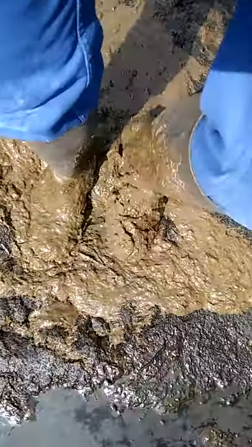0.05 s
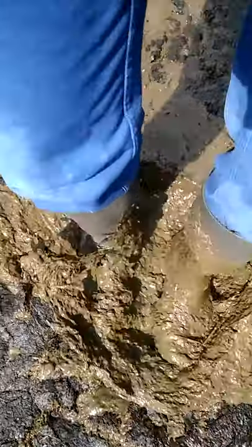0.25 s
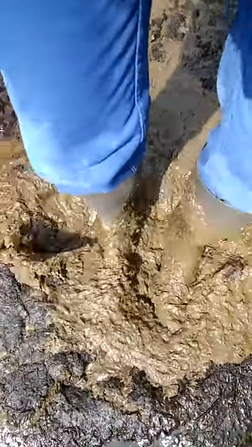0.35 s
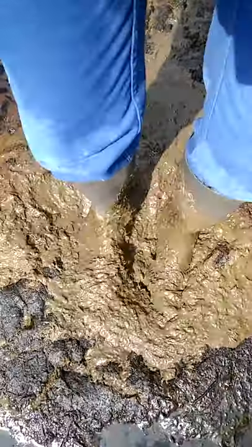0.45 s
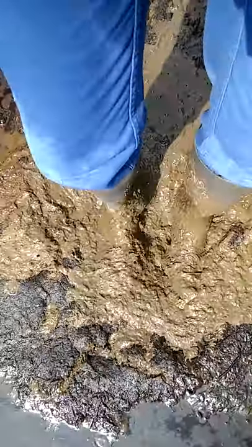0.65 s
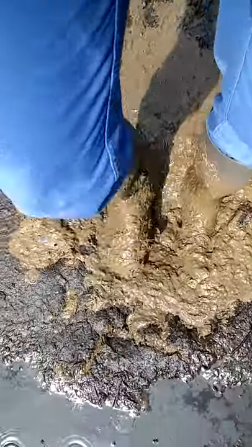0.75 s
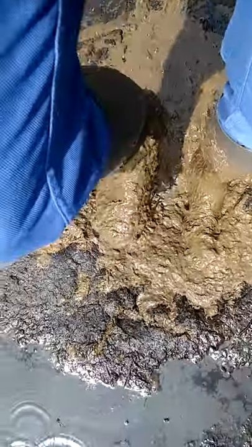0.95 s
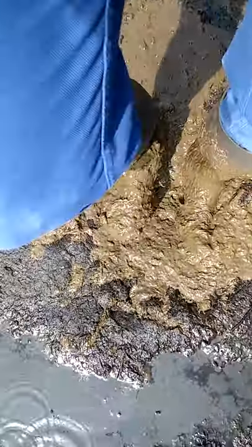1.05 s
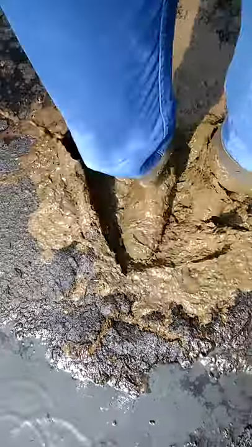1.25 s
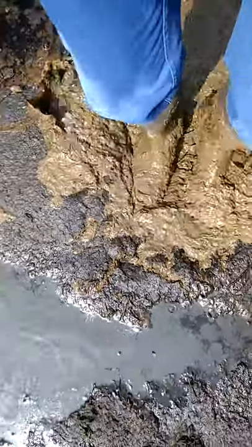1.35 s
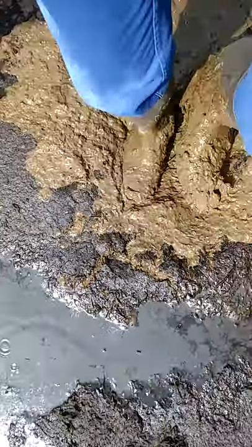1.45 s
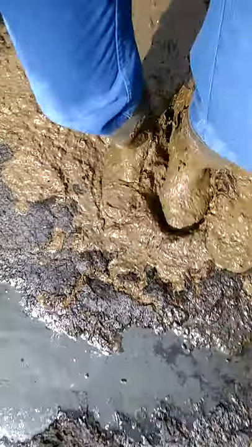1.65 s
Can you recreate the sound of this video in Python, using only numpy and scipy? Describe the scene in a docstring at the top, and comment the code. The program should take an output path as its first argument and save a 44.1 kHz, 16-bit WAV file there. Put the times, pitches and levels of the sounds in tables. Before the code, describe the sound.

Two wet, squelching boot stomps in mud, with wind on the microphone and faint birdsong.

```python
"""Boots stomping in wet mud

Rubber boots stomp twice in thick mud, close by, with smaller squelches as the weight shifts.
Each stomp squirts mud out in quick spurts, with wet pops and clicks, and the surface crackles.
Moving air buffets the microphone, most of all after the first stomp.
A songbird whistles farther off, with an outdoor echo."""
import sys
import numpy as np
from scipy import signal
from scipy.fft import rfft, irfft
from scipy.io import wavfile
from scipy.ndimage import uniform_filter1d

SR = 44100
rng = np.random.default_rng(int(sys.argv[2]) if len(sys.argv) > 2 else 0)


def bounce(signal):
    """Save signal as a 16-bit WAV file at the path given by the first command-line argument."""
    frames = np.transpose(np.atleast_2d(signal))
    limited = np.clip(frames, -1, 1)
    pcm = np.round(limited * 32767).astype(np.int16)
    wavfile.write(sys.argv[1], SR, pcm)


N = 74970
T = np.arange(N) / SR

# Squirts of mud: start_s, rise_s, fade_s, body_db, squelch_db, spray_db
# (fade_s is always the time a sound takes to drop by 60 dB)
SPURTS = [(0.203, 0.0056, 0.049, -19.5, -13.5, -12), (0.2203, 0.0015, 0.041, -17, -25, -18),
          (0.227, 0.0031, 0.11, -20.5, -15.5, -24), (0.244, 0.0043, 0.019, -21.5, -17, -37),
          (0.266, 0.002, 0.079, -54, -31, -31.5), (0.422, 0.021, 0.066, -54, -37, -43),
          (0.4635, 0.00053, 0.026, -42, -25, -28.5), (0.508, 0.00095, 0.021, -36.5, -37.5, -63),
          (0.636, 0.0016, 0.048, -53, -35, -45), (0.821, 0.035, 0.06, -41.5, -43.5, -75),
          (0.854, 0.003, 0.052, -31.5, -45, -54), (0.862, 0.0024, 0.02, -36.5, -33, -49),
          (0.911, 0.0011, 0.0064, -41, -43, -42), (0.9283, 0.00096, 0.013, -63, -33.5, -37.5),
          (1.164, 0.02, 0.1, -45.5, -43, -60), (1.2241, 0.0018, 0.024, -17.5, -13.5, -13.5),
          (1.2304, 0.002, 0.042, -14, -6.5, -19.5), (1.244, 0.0078, 0.097, -24, -17.5, -30.5),
          (1.2558, 0.00041, 0.024, -19, -12, -17), (1.268, 0.002, 0.0087, -25.5, -19.5, -27.5),
          (1.3992, 0.00036, 0.015, -36, -47, -51), (1.4999, 0.00053, 0.057, -37.5, -29.5, -46),
          (1.507, 0.00085, 0.24, -38.5, -38.5, -58), (1.535, 0.00086, 0.029, -52, -36, -46.5),
          (1.5603, 0.00043, 0.024, -34, -41, -47.5), (1.666, 0.004, 0.013, -44, -28.5, -33)]
# A squirt's low, middle and high tone, as coloured by the microphone: pitch_hz, relative_db
BODY_TONE = [(40, -18.5), (120, -2), (260, 1), (420, -2.5), (700, -4), (1150, 1), (1600, -3.5),
             (2300, -2.5), (6000, -48)]
SQUELCH_TONE = [(700, -39.5), (1500, -35.5), (2050, -0.5), (2800, -2.5), (3400, -6.5), (4200, 0),
                (4900, -11), (5800, -15.5), (12000, -64)]
SPRAY_TONE = [(2500, -29.5), (5200, -4.5), (6500, -9.5), (7500, -1.5), (9000, -4), (10300, -10),
              (11700, -9.5), (13500, -21), (16000, -13.5)]

def mud_spurts():
    """Mud squirts from under a boot in dense snaps: a dull body, a wet squelch and a fine spray."""
    shapes = np.array([swell(*row[:3]) for row in SPURTS])
    levels = from_db(np.array(SPURTS)[:, 3:])
    out = 0
    for level, tone in zip(levels.T, (BODY_TONE, SQUELCH_TONE, SPRAY_TONE)):
        loudness = np.sqrt(level ** 2 @ shapes ** 2)   # overlapping spurts add their power
        out += with_tone(loudness * snaps(per_s=5000, spread_db=1, hiss=0.28), tone)
    return out


# Wet pops and clicks: start_s, pitch_hz, level_db, fade_s, glide_octaves
POPS = [(.2105, 2048, -10, 0.021, -.1), (0.2149, 9170, -3.5, 0.0027, 0), (0.2196, 2002, 0, 0.015, 0.071),
        (0.2218, 2840, -5.5, 0.02, 0.18), (0.223, 4490, -10, 0.017, -0.2),
        (.248, 4180, -12.5, 0.022, -0.087), (0.264, 1670, -19.5, 0.022, 0.16),
        (.279, 1870, -23, 0.011, -.1), (0.4628, 2733, -20, 0.023, 0.79), (0.4668, 4544, -21.5, 0.032, -0.3),
        (.853, 1068, -24, 0.039, 0.16), (0.854, 2660, -29, 0.012, 0.098), (0.985, 2930, -34.5, 0.022, .1),
        (1.2255, 703, -19.5, 0.068, 0), (1.2262, 3223, -5.5, 0.032, 0.66), (1.2365, 4420, -7, 0.016, -0.14),
        (1.271, 3990, -18, 0.028, -0.033), (1.401, 825, -37.5, 0.013, 0), (1.48, 4600, -31, 0.018, -.2),
        (1.5007, 1244, -21.5, 0.024, .9), (1.502, 4450, -20, 0.03, -.13),
        (1.537, 550, -19.5, 0.022, -0.042), (1.5362, 1134, -17.5, 0.017, -0.0055),
        (1.538, 1720, -28.5, 0.026, -0.069), (1.54, 4400, -22, 0.029, -0.21),
        (1.583, 4400, -36.5, 0.026, 0)]

def wet_pops():
    """Short, rough pops and clicks; those near 4.2 kHz are the microphone ringing on sharp snaps."""
    out = 0
    for start_s, hz, db, fade_s, glide_octaves in POPS:
        roughness = 1 + 0.54 * waver(samples=int(3 * SR / hz))
        rise_s = 0.0003 + 1 / hz   # low pops start more slowly
        out += roughness * ring(start_s, hz, db, fade_s, rise_s, glide_octaves)
    return out


# Dull thumps: start_s, pitch_hz, level_db, fade_s
THUMPS = [(0.21, 72.4, -22, 0.043), (0.289, 256, -14.5, 0.0051), (0.315, 180, -13.5, 0.031),
          (0.378, 138, -17.5, 0.15), (0.3794, 627, -18.5, 0.003), (0.4374, 410, -22, 0.0046),
          (0.848, 303, -35, 0.046), (1.172, 232, -40.5, 0.062), (.438, 143, -13, 0.029),
          (0.451, 62.8, -16, 0.17), (.575, 106.6, -19.5, 0.091), (1.227, 133, -14.5, 0.097),
          (1.226, 247.7, -12, 0.051), (1.245, 65.6, -29, 0.29)]

def low_thumps():
    """Dull thumps come from the stomps and from puffs of air hitting the microphone."""
    return sum(ring(*row, rise_s=0.0031) for row in THUMPS)


# How loudly the mud crackles: time_s, level_db
CRACKLE_LEVELS = [(0, -54), (.2, -59.5), (.225, -38), (.29, -48), (.42, -47), (.565, -48.5), (.585, -40.5),
                  (.658, -50.5), (.675, -62), (.9, -53.5), (1.1, -63.5), (1.22, -55), (1.29, -44.5),
                  (1.35, -51), (1.46, -48.5), (1.6, -55), (1.7, -48.5)]
# The crackle's tone, as coloured by the microphone: pitch_hz, relative_db
CRACKLE_TONE = [(200, -0.5), (900, 3), (1450, -7.5), (2100, 6.5), (3200, -0.5), (4200, 6), (5200, -1),
                (6500, -6), (8300, -5), (10500, -11.5), (16000, -12)]

def mud_crackle():
    """The disturbed mud fizzes with tiny snaps and bubbles."""
    fizz = snaps(per_s=510, spread_db=2.5, hiss=0.89) + from_db(-2.5) * bubbles()
    return with_tone(from_db(curve(CRACKLE_LEVELS)) * unit_level(fizz), CRACKLE_TONE)


def bubbles(pitch_count=20, fade_cycles=48):
    """Tiny bubbles burst at random, each ringing briefly at its own pitch."""
    bursts = snaps(per_s=1100, spread_db=3.5, hiss=0)
    pitch_choice = rng.integers(0, pitch_count, N)
    out = 0
    for k, hz in enumerate(np.geomspace(1100, 12000, pitch_count)):
        angle = 2 * np.pi * hz / SR
        decay = from_db(-60 * hz / (fade_cycles * SR))
        kicks = bursts * (pitch_choice == k) + 1e-18
        feedback = [1, -2 * decay * np.cos(angle), decay * decay]   # makes each kick ring
        out += signal.lfilter([np.sin(angle), -np.sin(angle)], feedback, kicks)
    return unit_level(out)


# Lone drops of mud: start_s, level_db
DROPS = [(0.036, -43), (0.375, -38.5), (.658, -54), (.756, -46.5)]

def mud_drops():
    """Each drop lands with one short, wet tick."""
    loudness = sum(from_db(db) * swell(start_s, rise_s=0.0003, fade_s=0.017) for start_s, db in DROPS)
    return with_tone(loudness * rng.standard_normal(N), SPRAY_TONE)


# How hard the air hits the microphone: time_s, level_db
GUST_LEVELS = [(0, -54.5), (.19, -55), (.22, -25), (.27, -29.5), (.345, -25.5), (.38, -20.5), (.42, -25),
               (.445, -20), (.49, -40.5), (.568, -45.5), (.58, -32.5), (.62, -29), (.635, -38.5),
               (.68, -42), (.72, -53), (1.05, -60), (1.21, -53.5), (1.26, -34), (1.37, -43.5),
               (1.41, -40.5), (1.46, -49.5), (1.62, -50.5), (1.68, -33), (1.7, -45)]
# The tone of its deep rumble and its higher flutter: pitch_hz, relative_db
RUMBLE_TONE = [(20, -42), (35, -17), (50, 2.5), (85, -2), (125, -9.5), (200, -22.5), (400, -26.5),
               (1000, -57.5), (3000, -107)]
FLUTTER_TONE = [(50, -39.5), (115, 4.5), (220, 6), (400, -9.5), (750, -22), (1100, -43.5), (3000, -63)]

def air_buffeting():
    """Moving air rumbles on the microphone, and flutters too when it is strong."""
    gust_db = curve(GUST_LEVELS)
    flutter_db = -27.5 + 2.06 * (gust_db + 21)   # grows about twice as fast as the rumble
    rumble = from_db(gust_db) * steady_noise(RUMBLE_TONE, samples=1500)
    flutter = from_db(flutter_db) * steady_noise(FLUTTER_TONE, samples=1200)
    return rumble + flutter


# Bird notes, each a list of points: time_s, pitch_hz, level_db
BIRD_NOTES = [
    [(.005, 3600, -46), (.032, 4110, -46)],
    [(.028, 2840, -52), (.046, 3190, -39), (.065, 3220, -39.5), (.077, 3310, -40), (.092, 3720, -39.5),
     (.112, 4080, -42.5), (.13, 3710, -41)],
    [(.476, 2514, -48), (.5, 2623, -37), (.52, 3020, -38), (.548, 2780, -44.5), (.567, 2700, -37.5)],
    [(.608, 3040, -51), (.635, 3008, -34.5), (.658, 3037, -45)],
    [(.715, 4214, -43), (.732, 5210, -54.5), (.747, 4380, -37), (.756, 3466, -39), (.797, 3120, -36.5)],
    [(.992, 3836, -43), (1.018, 3838, -37.5), (1.066, 3750, -40.5)],
    [(1.102, 5170, -58), (1.122, 4750, -44.5), (1.134, 4490, -32), (1.142, 4480, -55), (1.15, 4240, -31.5),
     (1.18, 3880, -44.5), (1.206, 3500, -39)],
    [(1.308, 2774, -45), (1.333, 2660, -35.5), (1.357, 2505, -43)],
    [(1.476, 2180, -47), (1.495, 2430, -40), (1.518, 2722, -36), (1.535, 2617, -33.5), (1.55, 2500, -45.5)],
    [(1.581, 2600, -50), (1.593, 3070, -39.5), (1.614, 3283, -39.5), (1.632, 3170, -70)],
    [(1.657, 3150, -36), (1.676, 2520, -44.5), (1.699, 2630, -39.5)],
]
# Where the whistle breaks into a buzz: start_s, end_s
BIRD_BUZZES = [(0.105, .135), (1.041, 1.068)]

def songbird(buzz_per_s=310, buzz_depth_hz=210, edge_s=0.0032):
    """A bird whistles sliding, unsteady notes. Returns the direct song and the part leaves scatter."""
    buzz_on = sum(1.0 * ((T > start_s) & (T < end_s)) for start_s, end_s in BIRD_BUZZES)
    buzz_hz = uniform_filter1d(buzz_on, size=200) * buzz_depth_hz * np.sin(2 * np.pi * buzz_per_s * T)
    wobble_hz = 27.8 * waver(samples=120) + buzz_hz
    wobble_db = 2 * waver(samples=200)
    direct, scattered = 0, 0
    for note in BIRD_NOTES:
        times, hz, db = np.transpose(note)
        pitch = uniform_filter1d(np.interp(T, times, hz), size=260) + wobble_hz
        note_on = np.clip(np.minimum(T - times[0], times[-1] - T) / edge_s + 0.5, 0, 1)
        level = np.sin(note_on * np.pi / 2) ** 2 * from_db(np.interp(T, times, db) + wobble_db)
        whistle = level * np.sqrt(2) * np.sin(2 * np.pi * np.cumsum(pitch) / SR)
        scatter_db = -4.5 + 10.5 * np.log2(pitch / 3720)   # leaves scatter high notes more
        direct += whistle
        scattered += whistle * from_db(scatter_db)
    return direct, scattered


def outdoor_echo(sound, delay_s, fade_s):
    """The surroundings scatter sound back as a soft blur."""
    tail = rng.standard_normal(N) * swell(delay_s, 0.002, fade_s)
    return signal.fftconvolve(sound, tail / np.linalg.norm(tail))[:N]


# The tone of the open air: pitch_hz, relative_db
AIR_TONE = [(30, 11), (100, -8), (250, 0.5), (700, -18), (1500, -3.5), (3200, -20), (6000, -6.5),
            (9000, -7.5), (16000, -20)]

def background_air():
    """A faint, steady hush lies behind everything."""
    return from_db(-66) * with_tone(rng.standard_normal(N), AIR_TONE)


def from_db(db):
    """Turn decibels into a number to multiply by."""
    return 10 ** (np.asarray(db) / 20)


def unit_level(sound):
    """Scale a sound so its average power is 1."""
    return sound / np.sqrt(np.mean(sound ** 2) + 1e-20)


def curve(points):
    """Join (time_s, value) points with straight lines."""
    return np.interp(T, *np.transpose(points))


def with_tone(sound, tone, size=4096):
    """Filter a sound to the given tone; white noise keeps its power."""
    hz, db = np.transpose(tone)
    grid_hz = np.maximum(np.arange(size // 2 + 1) * SR / size, 1)
    gains = from_db(np.interp(np.log(grid_hz), np.log(hz), db))
    cepstrum = irfft(np.log(gains))
    cepstrum[1:size // 2] *= 2   # folded so the filter rings only after a snap, never before
    cepstrum[size // 2 + 1:] = 0
    response = irfft(np.exp(rfft(cepstrum)))
    return signal.fftconvolve(sound, response / np.linalg.norm(response))[:N]


def steady_noise(tone, samples):
    """Noise of the given tone, its level evened out over that many samples."""
    noise = with_tone(rng.standard_normal(N), tone)
    return noise / np.sqrt(uniform_filter1d(noise ** 2, samples) + 1e-9)


def snaps(per_s, spread_db, hiss):
    """Random tiny snaps of uneven size over a fine hiss."""
    sizes = from_db(spread_db * np.minimum(rng.exponential(1, N), 5))
    signs = rng.choice([-1, 1], N)
    clicks = sizes * signs * (rng.random(N) < per_s / SR)
    return unit_level(unit_level(clicks) + hiss * rng.standard_normal(N))


def swell(start_s, rise_s, fade_s):
    """A level that climbs in a straight line, then dies away."""
    age = T - start_s
    return np.clip(age / rise_s, 0, 1) * from_db(-60 * np.clip((age - rise_s) / fade_s, 0, 4))


def ring(start_s, hz, db, fade_s, rise_s, glide_octaves=0, settle_s=0.005):
    """A dying tone whose pitch can slide at first, then settles."""
    settled = 1 - np.exp(-np.maximum(T - start_s, 0) / settle_s)
    pitch = hz * 2 ** (glide_octaves * settled)
    wave = np.sin(2 * np.pi * np.cumsum(pitch * (T >= start_s)) / SR)
    return from_db(db) * swell(start_s, rise_s, fade_s) * wave


def waver(samples):
    """A smooth random wobble that changes over about that many samples."""
    return unit_level(uniform_filter1d(uniform_filter1d(rng.standard_normal(N), samples), samples))


def scene():
    """Mud close by, the bird far off and air all round, in one channel."""
    mud = mud_spurts() + wet_pops() + mud_crackle() + mud_drops()
    song, scattered = songbird()
    far_echo = outdoor_echo(scattered + from_db(-34) * mud, delay_s=0.016, fade_s=0.5)
    near_echo = from_db(-1) * outdoor_echo(scattered, delay_s=0, fade_s=0.07)   # ground and near leaves
    air = background_air()
    return (mud + low_thumps() + air_buffeting() + song + near_echo + far_echo + air)[None]


def record(dry):
    """Peaks that are too loud are clipped, and the highest treble is cut."""
    cutoff_hz = 15900
    treble_cut = signal.ellip(12, 0.1, 80, cutoff_hz, fs=SR, output="sos")
    return signal.sosfilt(treble_cut, np.clip(dry, -1, 1))


dry = scene()
out = record(dry)
bounce(out)
```